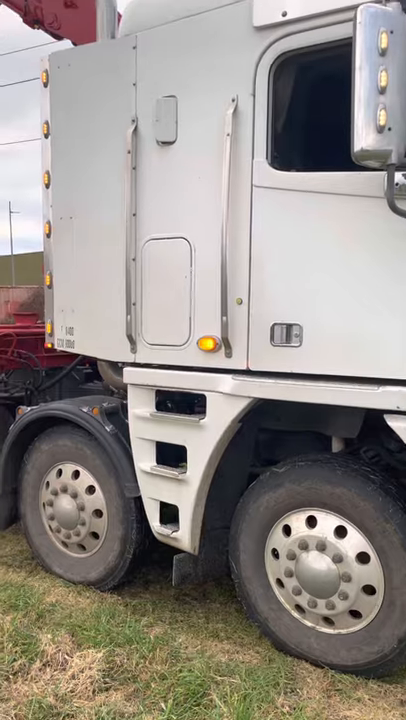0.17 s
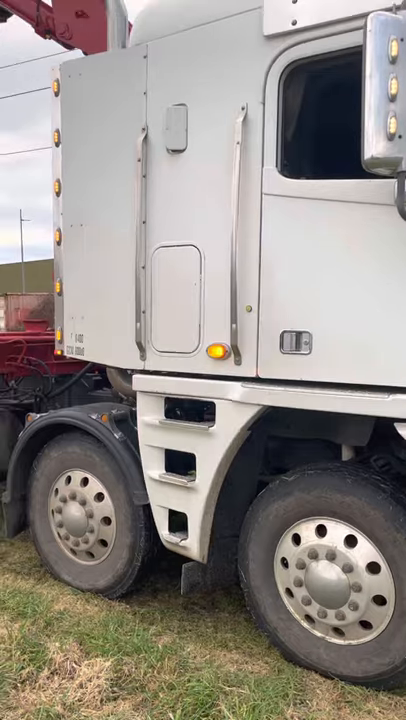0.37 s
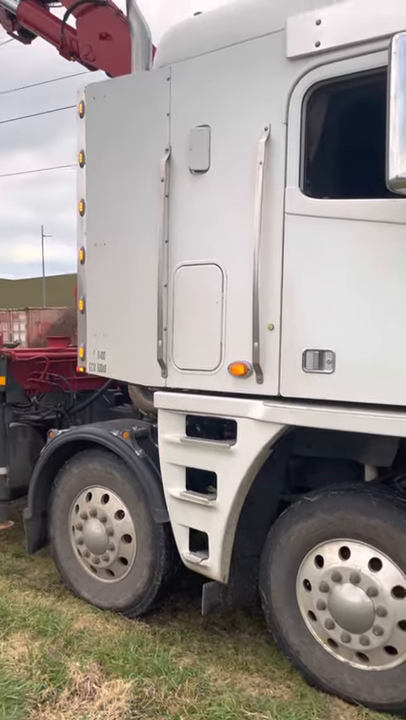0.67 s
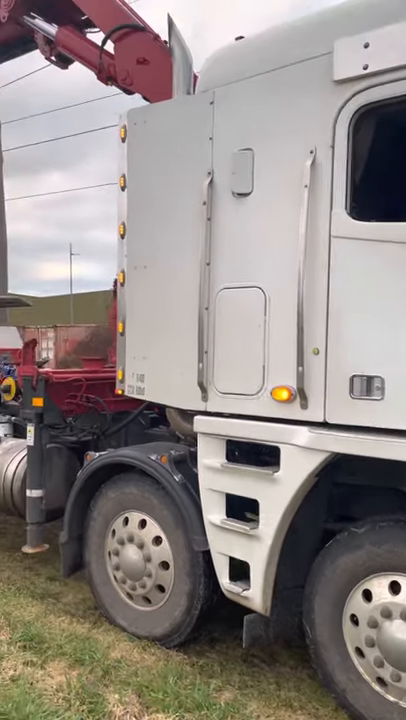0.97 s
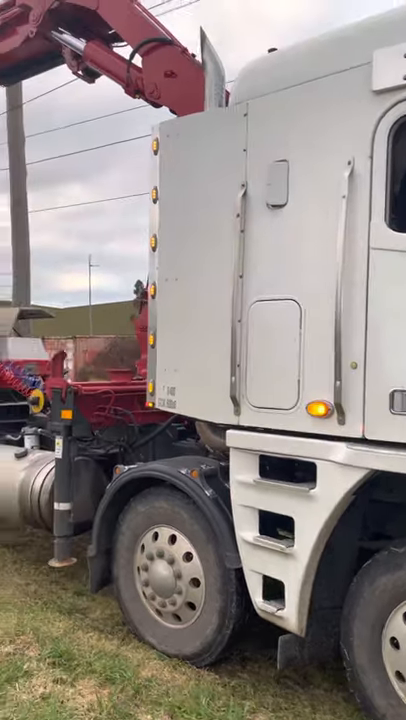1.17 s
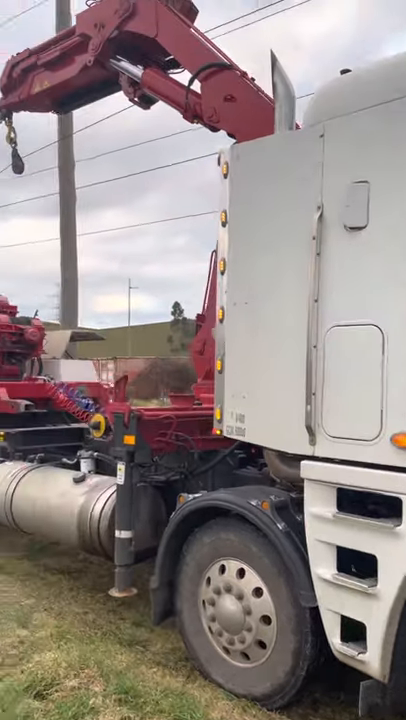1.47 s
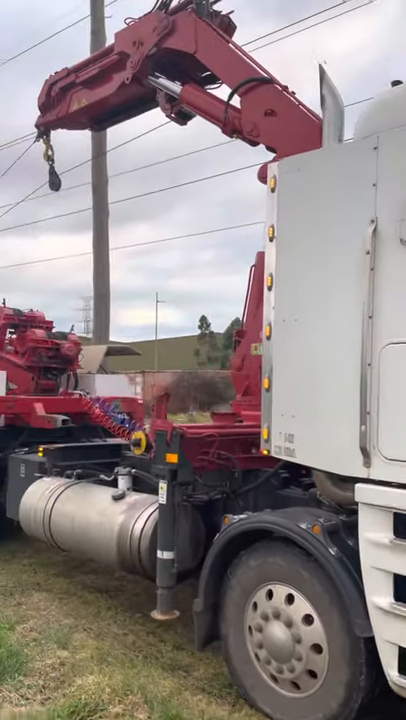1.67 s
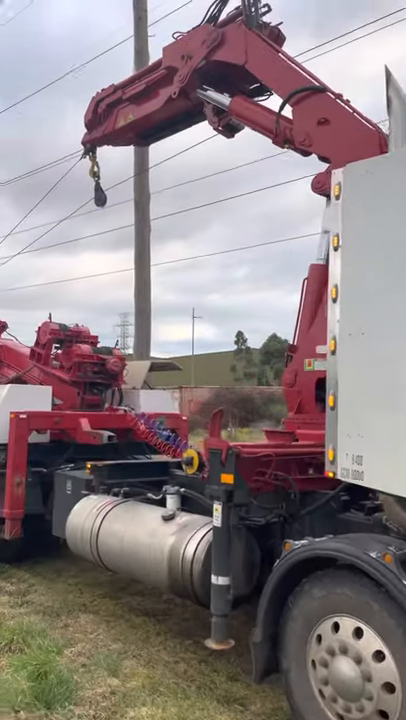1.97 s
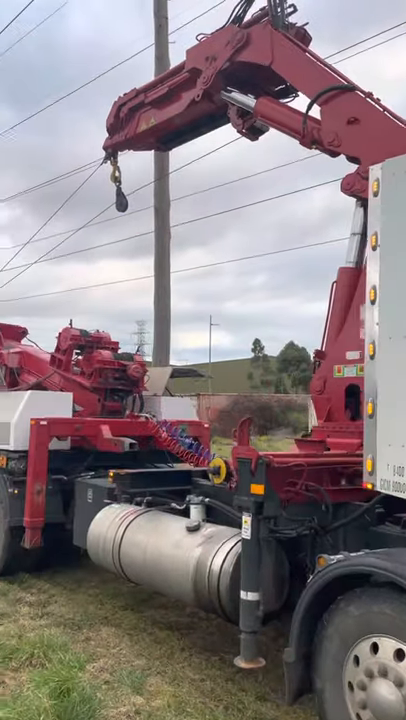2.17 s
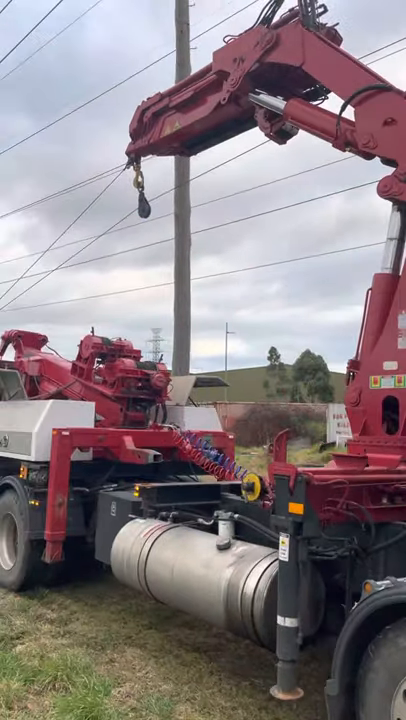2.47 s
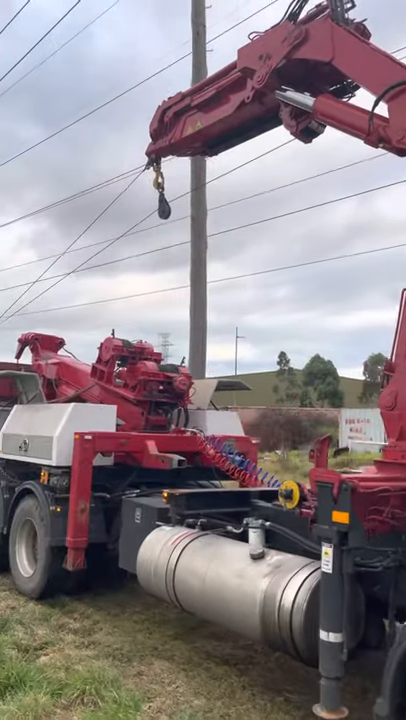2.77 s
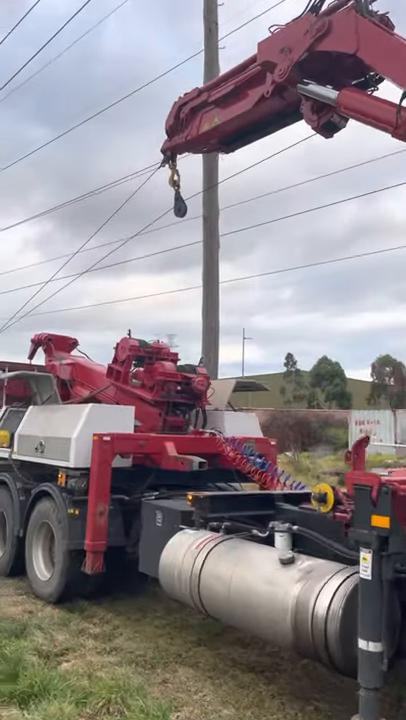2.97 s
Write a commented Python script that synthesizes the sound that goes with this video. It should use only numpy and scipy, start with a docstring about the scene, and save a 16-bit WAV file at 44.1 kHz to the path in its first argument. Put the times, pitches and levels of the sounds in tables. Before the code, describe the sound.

Heavy diesel idle clatters and roars throughout, a quick puff of compressed air with dull thumps comes before one second, then bass thins as the phone moves along the truck, outdoors; a faint knock ends it.

```python
"""Idling diesel truck

A six-cylinder diesel truck idles near a phone that swings from the cab towards the rear.
Exhaust hum and gear whine are sums of wavering tones; each firing rattles the ringing engine block.
Filtered noise makes the engine roar, part of it throbbing with the firings, and the air valve's spits and hiss.
A few dull thumps, each with a bounce, are short fading sine waves.
"""
import sys
import numpy as np
from scipy import signal
from scipy.fft import rfft, irfft, next_fast_len
from scipy.io import wavfile
from scipy.ndimage import uniform_filter1d

SR = 44100
rng = np.random.default_rng(int(sys.argv[2]) if len(sys.argv) > 2 else 0)


def transcribe(signal):
    """Save signal, clipped to [-1, 1], as a 16-bit WAV file at the path in sys.argv[1]."""
    frames = np.atleast_2d(signal).T
    limited = np.clip(frames, -1, 1)
    pcm = np.round(limited * 32767).astype(np.int16)
    wavfile.write(sys.argv[1], SR, pcm)


N = 137151

FIRING_HZ, FIRST_FIRING_S = 30.045, .004


def undb(db):
    """Turn decibels into a plain multiplier of the wave's size."""
    return 10 ** (np.asarray(db) / 20)


def on_log(table, hz, order):
    """Read a table's column at hz, with pitch spaced as the ear hears it (logarithmically)."""
    table = np.array(table, float)
    return np.interp(np.log(hz + 1), np.log(table[:, 0]), table[:, order])


def walk(rate):
    """Random wavering: levels held 1 / rate seconds, then smoothed twice; spread near 1."""
    hold = int(SR / rate)
    steps = np.repeat(rng.standard_normal(N // hold + 1), hold)
    smooth = uniform_filter1d(uniform_filter1d(steps, hold), hold)
    return 1.15 * smooth[:N]


def stereo_noise(colour, links):
    """Spectra of coloured noise at two microphones that share part of it, and their frequencies."""
    size = next_fast_len(N)
    hz = np.arange(size // 2 + 1) * SR / size
    # scaled so that 0 dB in the colour table means 0 dB per Hz
    left, other = rfft(rng.standard_normal((2, size))) * np.sqrt(SR / 2)
    like = np.clip(on_log(links, hz, order=1), 0, 1)
    right = like * left + np.sqrt(1 - like ** 2) * other
    right = right * np.exp(-1j * on_log(links, hz, order=2))
    left = left * undb(on_log(colour, hz, order=1))
    right = right * undb(on_log(colour, hz, order=2))
    return np.array([left, right]), hz, size


# levels as the phone turns; only their distance from the reference levels below is used:
# (time [s], bass [dB], upper bass [dB], low middle [dB], knock [dB], upper knock [dB], treble [dB], top hiss [dB])
TURN = [(0.05, -38.5, -44, -49, -40.5, -55, -48.5, -63), (0.129, -38.5, -41, -47.5, -41, -56, -52.5, -77),
        (0.28, -38.5, -44, -46.5, -40, -53.5, -48.5, -74),
        (0.481, -39.5, -41.5, -47.5, -41, -55.5, -52, -74.5),
        (0.61, -40.5, -35.5, -44.5, -39, -58.5, -50.5, -75),
        (0.71, -46.5, -44, -54.5, -38.5, -50.5, -53.5, -76),
        (0.921, -48, -48, -52, -38, -56.5, -51.5, -69.5),
        (1.269, -50.5, -49.5, -54.5, -39, -56.5, -53.5, -70),
        (1.609, -50, -52.5, -50.5, -39.5, -54.5, -55, -69.5), (1.881, -51.5, -51, -47, -39, -56, -56, -70),
        (2.119, -47.5, -47.5, -43.5, -40.5, -56, -55.5, -71),
        (2.58, -49, -44.5, -39.5, -42, -52.5, -54.5, -70.5), (3.1, -45, -46, -44.5, -41.5, -51, -56, -69)]
# middle of each of those seven bands: (frequency [Hz])
TURN_HZ = [70, 155, 280, 800, 1200, 2400, 5000]
# reference level of each band: (level [dB])
TURN_REF_DB = [-45, -45, -46, -39, -52, -54, -71]


def turn_db(t, hz):
    """Level change at hz while the phone turns."""
    rows = np.array(TURN, float)
    at_hz = [np.interp(np.log(hz), np.log(TURN_HZ), row[1:] - TURN_REF_DB) for row in rows]
    return np.interp(t, rows[:, 0], at_hz)


# how the two microphones relate: (frequency [Hz], likeness [0-1], left leads by [rad])
MIC_LINKS = [(40, 0.7, 0.39), (253, 0.94, 0.82), (373, 0.5, 1.22), (615, 0.66, 1.55), (745, 0.86, 1.23),
             (845, 0.78, 1.64), (915, 0.59, 1.6), (996, 0.75, 3.73), (1270, 0.95, 2.4), (1840, 0.95, 3.8),
             (1957, 0.4, 2.1), (3180, 0.49, 2.21), (5600, 0.73, 3.49), (9300, 0.74, 3.16), (10400, 0, 6.3)]


def tone(t, hz, db, phase):
    """One tone at both microphones, with the roar's left-right balance and the microphones' lead."""
    tilt_db = (on_log(ROAR, hz, order=1) - on_log(ROAR, hz, order=2)) / 2
    lead = on_log(MIC_LINKS, hz, order=2) / 2
    left = undb(tilt_db) * np.cos(phase + lead)
    right = undb(-tilt_db) * np.cos(phase - lead)
    return np.sqrt(2) * undb(db) * np.array([left, right])


# exhaust hum before turn and wander: (multiple of firing rate, level [dB], share of the turn followed)
HUM = [(1, -62.5, 1.5), (1.5, -62, 0.93), (2, -45.5, 1.28), (2.5, -54, 1.1), (3, -46.5, 1.4),
       (4, -48, 0.71), (4.5, -54, 0.5), (5, -59, 0.29), (5.5, -61.5, 0.58), (6, -61, 1.1), (7, -57, 1.8),
       (10, -61, 0.94)]
HUM_PHASE_RAD, HUM_SPREAD_RAD, HUM_WANDER_DB = 2.6, .03, 1.5


def hum(t, cycle):
    """Exhaust beats: tones at whole and half multiples of the firing rate, higher ones arriving later."""
    out = 0
    for k, db, follow in HUM:
        level_db = db + follow * turn_db(t, k * FIRING_HZ) + HUM_WANDER_DB * walk(3.3)
        phase = 2 * np.pi * k * cycle + HUM_PHASE_RAD - HUM_SPREAD_RAD * k ** 2
        out = out + tone(t, k * FIRING_HZ, level_db, phase)
    return out


# gear whine before turn and wander: (frequency [Hz], level [dB], wander [dB])
WHINE = [(617.6, -46, 1), (741.3, -54, 3), (1235.5, -62, 2.5)]
# change of the whine as the phone turns: (time [s], level change [dB])
WHINE_TURN = [(.1, 2.5), (.8, -0.5), (1.35, -15.5), (1.75, -2), (2.3, 4), (3, -3)]


def whine(t):
    """Gears sing steady notes that swell and waver slowly."""
    turned_db = np.interp(t, *np.array(WHINE_TURN).T)
    out = 0
    for hz, db, wander_db in WHINE:
        level_db = db + turned_db + wander_db * walk(1.5)
        phase = 2 * np.pi * hz * t + 1.44 * walk(3.885)
        out = out + tone(t, hz, level_db, phase)
    return out


# knock of each cylinder in firing order, before scatter: (strength [dB])
CYLINDERS_DB = [0.5, -4, -1.5, -2.5, -0.1, -2]
# brighter tick of each cylinder in firing order, before scatter: (strength [dB])
TICKS_DB = [4.5, -13, 7.5, -7.5, 2.5, 0]
KNOCK_RISE_S, KNOCK_FALL_S = .0035, .013
KNOCK_LATE_S = .006  # knock comes this long after the tick
KNOCK_SCATTER_DB = 1.3  # multiplies a random draw


def knocks(cycle, pattern_db, scatter):
    """Power of the firings, mean 1: quick rise, slower fall, each its own strength."""
    index = np.floor(cycle).astype(int) + 1
    since = (cycle % 1) / FIRING_HZ
    cylinder = (np.arange(len(scatter)) - 1) % len(pattern_db)
    strength_db = np.array(pattern_db)[cylinder] + KNOCK_SCATTER_DB * scatter
    size = undb(2 * strength_db)  # doubled dB: power, not wave size

    def shape(s):
        return (1 - np.exp(-s / KNOCK_RISE_S)) * np.exp(-s / KNOCK_FALL_S)

    # this firing plus the tail of the one before
    power = size[index] * shape(since) + size[index - 1] * shape(since + 1 / FIRING_HZ)
    return power / power.mean()


# modes of block and covers, level before turn and flicker:
# (level [dB], nominal ring time to -60 dB [s], time it faces the phone [s], loss away from that [dB per s])
BLOCK = [(-49.5, 0.4, 0.44, 0), (-42, 0.3, 1.95, 4), (-43, .2, 1.15, 6), (-48, 0.26, 1.3, 2.5),
         (-55, 0.15, 0.89, 0.5), (-47.5, 0.14, 2.9, 5), (-47.5, 0.11, 0.47, 2), (-61.5, 0.041, 0.31, 5.5),
         (-58.5, 0.19, 1.6, 4), (-67, 0.082, 0.83, 1), (-69, 0.056, 2.1, -2.5), (-62.5, 0.052, 2.2, 4.5),
         (-64, 0.07, 1.9, 2.5), (-81.5, 0.024, 2.5, 0)]
# pitch of each of those modes: (frequency [Hz])
BLOCK_HZ = [685, 822, 862, 932, 1005, 1115, 1484, 2080, 2250, 2995, 3230, 3390, 1930, 5350]
BLOCK_FLICKER_DB = 1.5
BLOCK_GRAIN = .8  # for long rings: 1 = comes and goes like noise, 0 = holds steady
BLOCK_WANDER = .008  # pitch stray as a share of the pitch, times a random walk


def block(t, knock, tick):
    """Each firing's rattle rings the modes of the block; the high ones answer to the tick."""
    out = 0
    for hz, (db, ring_s, facing, loss) in zip(BLOCK_HZ, BLOCK):
        if hz > 2800:
            drive = tick
        elif hz > 1800:
            drive = knock
        else:
            drive = np.sqrt(knock)
        rattle = rng.standard_normal(N) * drive
        # two equal resonances in a row make the ring build up before it fades
        pole = np.exp(2j * np.pi * hz / SR - 2 * np.log(1000) / (ring_s * SR))
        ring = signal.lfilter([1], np.poly([pole, pole]), rattle)
        size = np.abs(ring) ** (BLOCK_GRAIN if ring_s > .1 else 1)
        size = size / np.sqrt(np.mean(size ** 2))
        stray = 2 * np.pi * hz * BLOCK_WANDER * np.cumsum(walk(5)) / SR
        level_db = db - loss * np.abs(t - facing) + turn_db(t, hz) + BLOCK_FLICKER_DB * walk(3.9)
        out = out + size * tone(t, hz, level_db, np.angle(ring) + stray)
    return out


# colour of the roar before turn and flicker: (frequency [Hz], left [dB per Hz], right [dB per Hz])
ROAR = [(25.3, -83, -72.5), (47, -62, -63), (99, -65, -67), (150, -61.5, -66), (207, -65.5, -71),
        (264, -62, -68.5), (370, -66, -76), (410, -74, -66), (576, -69, -68.5), (616, -60.5, -62.5),
        (787, -64, -67), (804, -55.5, -57.5), (863, -66.5, -59.5), (1007, -59.5, -57.5), (1090, -69, -80),
        (1460, -75, -71.5), (1714, -73, -72.5), (2160, -92, -75.5), (2260, -87, -81), (2780, -87, -87),
        (3410, -92, -87), (3605, -99, -99), (5550, -95, -95.5), (6040, -101, -101), (6990, -112, -112),
        (7950, -128, -128), (13000, -134, -134), (15500, -140, -140)]
# how much of the roar throbs: (frequency [Hz], share [0-1])
KNOCK_SHARE = [(60, .1), (300, .3), (800, .7), (1400, .45), (2000, .35), (3300, .45), (6000, .4)]
SWELL_DB, FLICKER_DB = .5, 1.2


def roar(t, knock):
    """Panels and gas roar as noise; in each band part throbs with the firings, and the level flickers."""
    spectra, hz, size = stereo_noise(ROAR, MIC_LINKS)
    out, swell = 0, walk(7.3)
    for centre in 20 * 2 ** np.arange(0, 10, .5):
        # half-octave steps that overlap smoothly
        window = np.cos(np.pi * np.clip(np.log2((hz + 1) / centre), -.5, .5)) ** 2
        band = irfft(spectra * window, size)[:, :N]
        share = np.clip(on_log(KNOCK_SHARE, centre, order=1), 0, 1)
        throb = np.sqrt(1 - share + share * knock)
        gain = undb(turn_db(t, centre) + SWELL_DB * swell + FLICKER_DB * walk(11.18))
        out = out + band * throb * gain
    return out


# short spits of air, level relative to the air's colour:
# (peak time [s], level [dB], rise [dB per s], hold [s], fall [dB per s], low edge [Hz])
SPITS = [(0.546, -7.5, 1502, 0.0039, 897, 3000), (0.799, -6, 2502, 0.018, 1798, 2500)]
# colour of the air before its levels below: (frequency [Hz], left [dB per Hz], right [dB per Hz])
AIR = [(199, -67.5, -73), (346, -80, -65), (550, -63.5, -54), (885, -71, -67), (1030, -89.5, -84.5),
       (1180, -72.5, -65.5), (1329, -58.5, -53), (1445, -78.5, -67.5), (1560, -96.5, -79.5),
       (2585, -70, -70.5), (3300, -81, -79.5), (6020, -87, -86), (7440, -104, -100.5), (7600, -116, -116),
       (10400, -112, -116), (12100, -140, -140)]
# how the microphones relate for the air: (frequency [Hz], likeness [0-1], left leads by [rad])
AIR_LINKS = [(200, 0.82, -1), (593, 0.79, 0), (1100, 0.83, -2), (2130, 0.27, -3), (4830, 1, -5),
             (10000, 0.42, -3)]
# the long hiss swells and fades, relative to the colour: (time [s], body level [dB], treble level [dB])
HISS = [(.55, -40, -40), (.565, -20, -15), (.605, -10, -13), (.635, -5, -7), (.66, -3, -4), (.68, -1, 0),
        (.71, 0, 0), (.745, -2, -4), (.775, -3, -9), (.8, -7, -12), (.825, -14, -20), (.84, -40, -40)]
HISS_SPLIT_HZ, AIR_FLUTTER_DB = 1100, 2


def puffs(t):
    """Compressed air escapes as noise: a thin spit, a swelling hiss, a bright spit as the valve shuts."""
    spectra, hz, size = stereo_noise(AIR, AIR_LINKS)
    times, body_db, treble_db = np.array(HISS).T
    body = undb(np.interp(t, times, body_db, -99, -99))
    treble = undb(np.interp(t, times, treble_db, -99, -99))
    high = irfft(spectra * (hz > HISS_SPLIT_HZ), size)[:, :N]
    low = irfft(spectra, size)[:, :N] - high
    out = low * body + high * treble
    for peak, db, rise, hold, fall, edge_hz in SPITS:
        thin = irfft(spectra * hz ** 2 / (hz ** 2 + edge_hz ** 2), size)[:, :N]
        before = np.clip(peak - t, 0, None)
        after = np.clip(t - peak - hold, 0, None)
        out = out + thin * undb(db - rise * before - fall * after)
    return out * undb(AIR_FLUTTER_DB * walk(60))


# thumps, level before the ring's shape: (start [s], level [dB], pitch [Hz], left minus right [dB])
THUMPS = [(0.5511, -15.5, 629, -12), (0.768, -17, 513, -10), (3.0372, -8.5, 432, 6.5)]
# modes of a thump: (multiple of its pitch, level [dB])
THUMP_MODES = [(.55, -3), (1, 0), (1.6, -13)]
THUMP_RISE_S, THUMP_T60_S = .0012, .014  # T60: time to fade by 60 dB
THUMP_BOUNCE_S, THUMP_BOUNCE_DB = .00353, -5


def thumps(t):
    """Short dull knocks: a few modes ring and die quickly, then a weaker bounce repeats them."""
    out = 0
    for start, db, hz, pan_db in THUMPS:
        for late, late_db in ((0, 0), (THUMP_BOUNCE_S, THUMP_BOUNCE_DB)):
            since = np.clip(t - start - late, 0, None)
            modes = sum(undb(mode_db) * np.sin(2 * np.pi * k * hz * since) for k, mode_db in THUMP_MODES)
            rise = 1 - np.exp(-(since / THUMP_RISE_S) ** 2)
            ring = modes * np.exp(-np.log(1000) * since / THUMP_T60_S) * rise
            out = out + ring * undb(db + late_db + np.array([[pan_db], [-pan_db]]) / 2)
    return out


def scene():
    """Add up the layers; hum, knocks and ticks share one count of firings."""
    t = np.arange(N) / SR
    cycle = FIRING_HZ * (t - FIRST_FIRING_S)
    knock_scatter, tick_scatter = rng.uniform(-1.5, 1.5, (int(cycle[-1]) + 3, 2)).T
    knock = knocks(cycle - FIRING_HZ * KNOCK_LATE_S, CYLINDERS_DB, knock_scatter)
    tick = knocks(cycle, TICKS_DB, tick_scatter)
    engine = hum(t, cycle) + whine(t) + block(t, knock, tick) + roar(t, knock)
    return engine + puffs(t) + thumps(t)


# stereo width of the lows, 1 = full: (time [s], width below first edge, width between edges)
LOW_WIDTH = [(.06, -0.18, 0.64), (.14, -0.12, 0.064), (.26, 0.79, 0.15), (.55, 1, 0.27), (.85, .95, 0.56),
             (1.5, 1, 1)]
# the two edges: (frequency [Hz])
LOW_WIDTH_EDGES_HZ = [130, 350]
START_S, TOP_HZ = .035, 16300


def record(dry):
    """The phone opens after a moment of silence, its lows start narrow and widen, and it cuts the top."""
    t = np.arange(N) / SR
    mid, side = (dry[0] + dry[1]) / 2, (dry[0] - dry[1]) / 2
    low, both = (signal.sosfiltfilt(signal.butter(4, hz, fs=SR, output="sos"), side)
                 for hz in LOW_WIDTH_EDGES_HZ)
    times, low_width, between_width = np.array(LOW_WIDTH).T
    wide_low = low * np.interp(t, times, low_width)
    wide_between = (both - low) * np.interp(t, times, between_width)
    side = side - both + wide_low + wide_between
    opened = np.clip((t - START_S) / 0.00024, 0, 1)
    top_cut = signal.ellip(8, .2, 70, TOP_HZ, fs=SR, output="sos")
    return signal.sosfilt(top_cut, np.array([mid + side, mid - side]) * opened)


dry = scene()
out = record(dry)
transcribe(out)
```